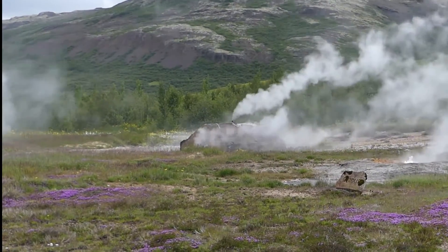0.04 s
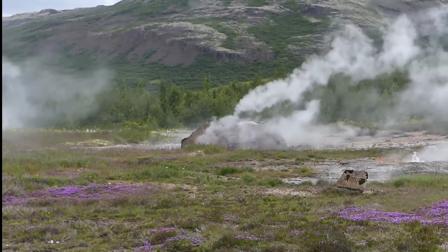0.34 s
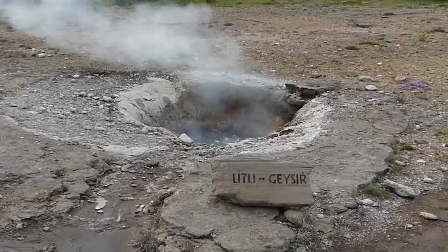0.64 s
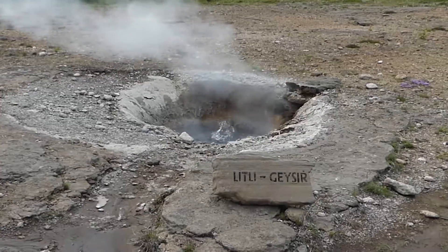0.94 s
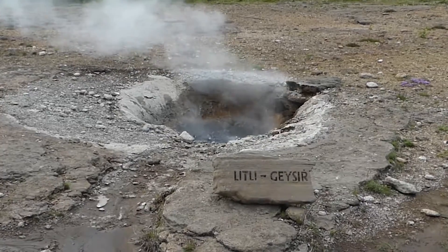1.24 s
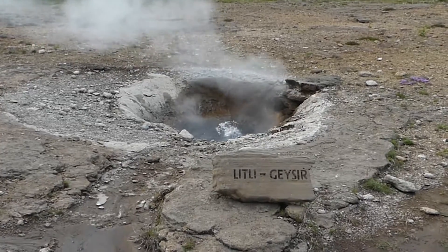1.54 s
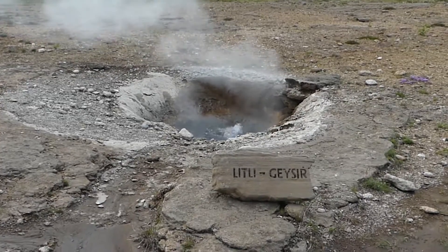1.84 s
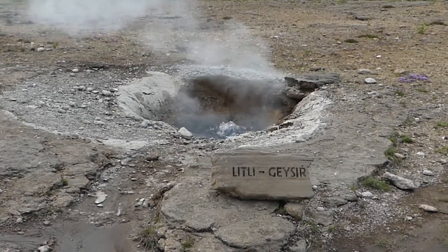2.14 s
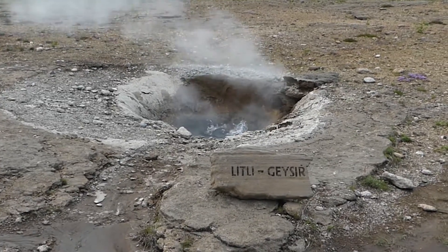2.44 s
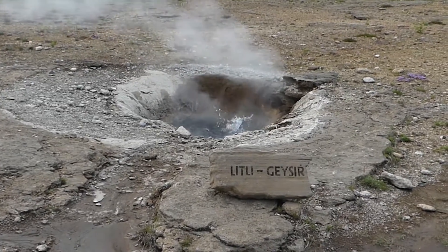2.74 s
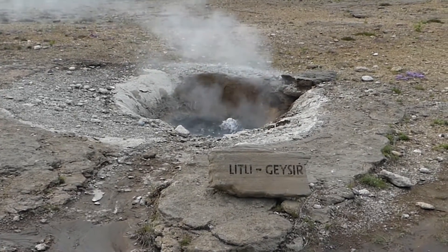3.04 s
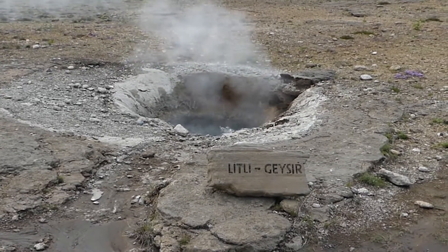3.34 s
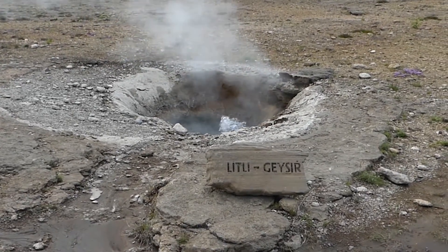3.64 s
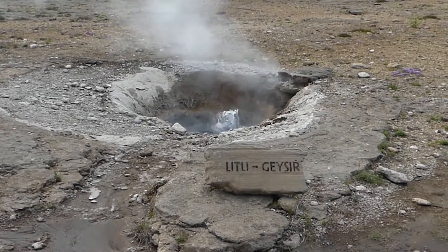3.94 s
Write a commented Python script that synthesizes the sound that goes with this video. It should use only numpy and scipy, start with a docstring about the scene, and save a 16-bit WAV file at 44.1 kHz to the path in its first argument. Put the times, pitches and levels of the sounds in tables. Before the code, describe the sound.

A far helicopter chops past a small boiling pool, following a moment of buffeting wind.

```python
"""Gusts of wind buffet the microphone over the hiss of far steam vents, with a few ticks and faint chirps. This
first scene of a geothermal field stops dead with a click. After a short silence a small boiling pool fades in:
bubbles ring, drops patter, steam hisses and water spits. A distant helicopter drifts from the left towards the
centre. Its main blades thump and chop the air into a roar and a swelling rush, all bouncing off the ground,
while its tail rotor hums and whines. A thin rising whistle comes at the very end."""
import sys
import numpy as np
from scipy import signal
from scipy.fft import rfft, irfft
from scipy.io import wavfile
from scipy.ndimage import uniform_filter1d

SR = 44100
rng = np.random.default_rng(int(sys.argv[2]) if len(sys.argv) > 2 else 0)


def inscribe(sig):
    """Save sig as 16-bit PCM at rate SR to the path in sys.argv[1].

    A 1-D sig is mono; a 2-D sig holds one channel per row.
    Samples are clipped to [-1, 1] before scaling.
    """
    pcm = np.round(np.clip(np.atleast_2d(sig).T, -1, 1) * 32767)
    wavfile.write(sys.argv[1], SR, pcm.astype(np.int16))


N = 176400

WIND_STOP_S, POOL_START_S, FADE_S, FADE_FROM_DB = .663, .897, .21, -19.5
BLADE_HZ, TAIL_HZ = 12.98, 84.3  # blade passes per second: main rotor, tail rotor
THUMP_AT_S, DOPPLER_PER_S = 2.256, .0045  # time of one thump; share of the pitch lost each second

# Levels in the tables are relative: the functions may turn a whole layer up or down.
# strength of the gusts (time [s], level [dB])
GUST_LEVELS = [(0.0, -36.5), (0.032, -43.5), (0.186, -31.5), (0.202, -25.5), (0.256, -30.5), (0.378, -28),
               (0.412, -32), (0.5, -24.5), (0.532, -29.5), (0.594, -23.5), (0.618, -35), (0.645, -23.5)]
# tone colour of wind on the microphone (frequency [Hz], level [dB])
WIND_COLOUR = [(25, -46.5), (60, -12.5), (130, 1), (220, -0.5), (340, -9), (480, -17), (800, -30.5),
               (2000, -54)]
# tone colour of the far steam vents (frequency [Hz], level [dB])
VENT_COLOUR = [(100, 6.5), (500, -0.5), (1400, 2), (2500, -8), (4000, -15.5), (6300, -16.5), (8000, -21),
               (11000, -20), (15500, -31)]
# faint high chirps, perhaps birds (time [s], length [s], level [dB], pitch [Hz], rise [octaves/s])
CHIRP_NOTES = [(.071, .003, -54.5, 7600, -10), (.133, .004, -53.5, 6100, 0), (.256, .003, -54.5, 5500, -10),
               (.302, .003, -45, 3380, -3), (1.335, .015, -66, 7700, 0), (2.687, .007, -44.5, 3240, 2.5)]
# ticks and spits, plus the sharp click at .661 s as the first scene stops (time [s], peak [dB], pitch [Hz],
# width [octaves], decay [s], left minus right [dB])
TICK_BURSTS = [(.142, -39, 2400, .4, .004, -10), (.166, -29.5, 1600, .7, .0017, 8),
               (.427, -29, 6900, 3, .0007, -3), (.482, -39, 1700, .7, .002, 0),
               (.583, -37, 2200, 1, .003, -2), (.661, -21, 1800, 2.2, .0006, 0),
               (1.652, -33, 1900, .33, .0037, 4), (1.779, -42, 9000, 1, .005, -2),
               (2.100, -38, 4500, .7, .002, -3), (2.117, -32, 4800, .85, .002, -6),
               (2.348, -38, 3200, .6, .0015, 0), (2.371, -41, 6500, .5, .002, -2.5),
               (2.381, -40, 6000, .7, .003, -3), (2.397, -31, 2200, .6, .003, 2),
               (2.405, -30.5, 2300, .7, .006, -1), (2.423, -32, 3000, .9, .004, -1),
               (2.474, -34, 2800, .5, .004, -3), (2.733, -38, 3400, .3, .002, -3),
               (2.858, -38, 12600, .2, .0015, -1), (3.021, -33, 2800, .6, .005, -.5),
               (3.036, -35, 2800, .35, .003, 0), (3.078, -38, 6500, .8, .003, -7),
               (3.105, -32, 4880, .58, .003, -5), (3.12, -37.5, 4400, .5, .007, -5),
               (3.329, -41, 4500, 1, .002, -2), (3.965, -35, 4500, .8, .0024, -2.5)]
# single swirls of air that knock on the microphone (time [s], peak [dB], pitch [Hz])
WIND_KNOCKS = [(.206, -20.5, 450), (.370, -20.5, 300), (0.47, -24, 384), (0.495, -19, 142),
               (0.586, -15, 242)]
# where the helicopter is heard (time [s], left minus right [dB])
HELICOPTER_PAN = [(1.0, 6.4), (1.7, 5.6), (2.3, 3.4), (3.0, 2), (4.0, 2)]
# loudness of the rotors' thump, roar and hum (time [s], level [dB])
ROTOR_LEVELS = [(1.1, -36), (1.4, -37), (1.6, -36), (1.85, -33), (2.05, -33.5), (2.3, -30.5), (2.7, -33.5),
                (3.0, -37), (3.35, -38.5), (3.7, -36), (4.0, -33.5)]
# tone colour of a blade's thump (frequency [Hz], level [dB])
THUMP_COLOUR = [(25, -99), (50, -25), (100, 4), (140, 5.5), (180, 0), (220, 6), (290, -8), (600, -55)]
# tone colour of the main rotor's low roar (frequency [Hz], level [dB])
ROAR_COLOUR = [(30, -60.5), (80, 2), (130, 12.5), (200, 9), (270, 7), (370, 2), (520, -5.5), (900, -27.5)]
# loudness of the helicopter's rushing air (time [s], level [dB])
RUSH_LEVELS = [(1.08, -42), (1.2, -39), (1.35, -37.5), (1.52, -35.5), (1.8, -33), (2.02, -36.5),
               (2.15, -34), (2.42, -32.5), (2.6, -34), (2.72, -37), (2.9, -34), (3.14, -35.5), (3.18, -41),
               (3.3, -38.5), (3.48, -42), (3.68, -39), (3.85, -37), (3.98, -32.5)]
# tone colour of that rushing air (frequency [Hz], level [dB])
AIR_COLOUR = [(100, -11), (300, 4.5), (480, 4), (700, 0.5), (1050, -4), (1500, -13), (2200, -20),
              (3200, -36), (6000, -66.5)]
# loudness of the tail rotor's whine (time [s], level [dB])
WHINE_LEVELS = [(1.12, -43), (1.62, -42), (1.71, -25.5), (1.84, -26), (2.0, -33), (2.17, -32), (2.29, -26),
                (2.42, -32), (2.6, -36.5), (2.85, -31.5), (3.0, -28.5), (3.08, -31), (3.15, -27),
                (3.25, -27), (3.31, -36), (3.4, -31.5), (3.6, -35), (3.7, -32), (3.92, -32), (3.98, -29)]
# tones in the whine of tail rotor and gears (pitch [times TAIL_HZ], level [dB])
WHINE_TONES = [(3.855, -8), (4, -3), (6, -17), (8, -15), (10, -18), (12, -22)]
# moments when one whine tone flares up (time [s], length [s], level [dB], pitch [times TAIL_HZ])
WHINE_FLARES = [(2.102, 0.014, -34, 12), (2.165, 0.018, -34, 12), (2.52, .02, -33, 8),
                (2.615, 0.028, -32.5, 8), (2.95, .012, -30, 8), (3.075, .018, -33, 8),
                (3.132, .014, -31.5, 8)]
# how hard the pool boils (time [s], level [dB])
BOIL_LEVELS = [(1.08, -65.5), (1.35, -64), (1.5, -56), (1.8, -56.5), (2.03, -60), (2.14, -52.5),
               (2.3, -54.5), (2.42, -52), (2.55, -54.5), (2.7, -55), (2.9, -56.5), (3.03, -52), (3.13, -53),
               (3.25, -55.5), (3.45, -61), (3.72, -59), (3.82, -53), (3.98, -54)]
# tone colour of the fine spray (frequency [Hz], level [dB])
SPRAY_COLOUR = [(400, -9.5), (1500, 13), (3000, 1), (4200, -5.5), (6300, -4), (7600, -14), (10000, -9),
                (15500, -17)]
# tone colour of steam hissing off the pool (frequency [Hz], level [dB])
HISS_COLOUR = [(3000, -2.5), (6300, 3), (7600, 2), (10500, 6.5), (15500, -2)]
# brief swells of rushing noise (peak time [s], length [s], level [dB], pitch [Hz])
RUSH_SWELLS = [(1.244, .042, -44, 1300), (1.78, .08, -40, 1000), (3.595, .02, -39.5, 886),
               (3.757, .003, -34, 870), (2.405, .028, -36.5, 1500), (2.465, .04, -31.5, 760),
               (2.84, .03, -32.5, 660), (2.855, .075, -32.5, 1080), (3.98, .03, -33, 520)]
# a thin rising whistle, perhaps a bird (time [s], pitch [Hz], level [dB])
WHISTLE_GLIDE = [(3.88, 1850, -60), (3.925, 1980, -54), (3.955, 2230, -45), (3.975, 2480, -50),
                 (4.0, 2560, -47)]


def undb(db):
    """Turn decibels into a gain to multiply by."""
    return 10 ** (np.asarray(db) / 20)


def unit(x):
    """Scale a signal to an average (rms) level of 1."""
    return x / np.sqrt(np.mean(x ** 2) + 1e-20)


def curve(rows, column=1):
    """One column of a table, joined by straight lines in time."""
    rows = np.array(rows, float)
    return np.interp(np.arange(N) / SR, rows[:, 0], rows[:, column])


def wobble(per_s):
    """A smooth random wander of size about 1, with per_s new values a second."""
    hold = int(SR / per_s)
    steps = np.repeat(rng.standard_normal(N // hold + 1), hold)
    return unit(uniform_filter1d(uniform_filter1d(steps, hold), hold)[:N])


def swell(when, length):
    """A bell-shaped rise and fall around a moment."""
    return np.exp(-.5 * ((np.arange(N) / SR - when) / length) ** 2)


def colour(x, points):
    """Give x a tone colour from (Hz, dB) points, falling away past both ends; the result has level 1."""
    hz, db = np.array(points, float).T
    f = np.maximum(np.arange(N + 1) * SR / (2 * N), 1)
    gain = undb(np.interp(np.log(f), np.log(hz), db))
    gain *= np.minimum(f / hz[0], 1) * np.minimum(hz[-1] / f, 1) ** 2
    # this folding makes the filter ring only after a sound, never before it
    cepstrum = irfft(np.log(gain))
    cepstrum[1:N] *= 2
    cepstrum[N + 1:] = 0
    return unit(irfft(rfft(x, 2 * N) * np.exp(rfft(cepstrum)))[..., :N])


def band(x, hz, octaves):
    """Keep a bell-shaped range of pitches around hz."""
    size = x.shape[-1]
    f = np.maximum(np.arange(size // 2 + 1) * SR / size, 1)
    return irfft(rfft(x) * np.exp(-.5 * (np.log2(f / hz) / octaves) ** 2), size)


def noise(width_db):
    """Stereo white noise; the lower width_db, the more alike left and right are."""
    mid, side = rng.standard_normal((2, N))
    return mid + undb(width_db) * np.array([side, -side])


def pan(db):
    """Left and right gains; a positive db moves the sound to the left."""
    return undb(np.array([db, -db]).reshape(2, -1) / 2)


def wind():
    """Gusts shed swirls of air over the microphone's openings, making a fluttering rumble."""
    swirls = colour(noise(width_db=-3) * undb(2 * wobble(58.34)), WIND_COLOUR)
    return swirls * undb(curve(GUST_LEVELS) + 2.5) * pan(2)


def steam_vents():
    """Far vents hiss and sputter behind the wind."""
    hiss = colour(noise(width_db=-4), VENT_COLOUR) * undb(-46 + 1.3 * wobble(13))
    sputter = undb(-59.5) * droplets()
    return (hiss + sputter) * pan(2.5)


def plinks(per_s, low_hz, high_hz, cycles, rise, tilt, spread_db):
    """Bubbles or drops ring briefly; rise bends each pitch up, tilt makes the big, low ones louder."""
    out = np.zeros((2, N + SR))
    for when, height, strength, place in rng.random((int(per_s * N / SR), 4)):
        hz = low_hz * (high_hz / low_hz) ** height
        age = np.linspace(0, 1, int(min(cycles / hz, .5) * SR))
        ring = np.sin(2 * np.pi * cycles * age * (1 + rise * age)) * undb(-60 * age)
        boost_db = spread_db * min(-np.log(1 - strength), 5)  # a few stand out from the rest
        gain = undb(boost_db) * (low_hz / hz) ** tilt
        start = int(when * N)
        out[:, start:start + len(age)] += ring * gain * pan(14 * (place - .5))
    return unit(out[:, :N])


def droplets():
    """Tiny drops patter, each with a short high ring."""
    return plinks(per_s=800, low_hz=2200, high_hz=13000, cycles=12, rise=0, tilt=.75, spread_db=3.2)


def chirps():
    """Tiny gliding, warbling notes from far away."""
    out, t = 0, np.arange(N) / SR
    warble = 1 + .02 * wobble(450)
    for when, length, db, hz, rise in CHIRP_NOTES:
        pitch = hz * warble * 2 ** (rise * np.clip(t - when, -4 * length, 4 * length))
        out = out + undb(db) * swell(when, length) * np.sin(2 * np.pi * np.cumsum(pitch) / SR)
    return out


def ticks(size=4096):
    """Sharp ticks and spits: each is a burst of noise that starts fast and dies away."""
    out, age = np.zeros((2, N + size)), np.arange(size) / SR
    for when, db, hz, octaves, decay, pan_db in TICK_BURSTS:
        shape = np.exp(-age / decay) * (1 - np.exp(-age / (.4 * decay)))
        burst = band(rng.standard_normal(size), hz, octaves) * shape
        start = int(when * SR)
        out[:, start:start + size] += burst / np.abs(burst).max() * undb(db) * pan(pan_db)
    return out[:, :N]


def knocks():
    """A swirl of air hits the microphone as a single swing of pressure."""
    t = np.arange(N) / SR
    return sum(undb(db) * swell(when, .3 / hz) * np.cos(2 * np.pi * hz * (t - when))
               for when, db, hz in WIND_KNOCKS) * pan(9)


def ground_bounce(x, delay_s=.005786, echo_db=-5):
    """The ground adds a slightly late copy, which boosts some pitches and weakens others."""
    late = irfft(rfft(x) * np.exp(-2j * np.pi * np.arange(N // 2 + 1) * delay_s * SR / N), N)
    return unit(x + undb(echo_db) * late)


def main_rotor(clock):
    """Each passing blade thumps once and chops the churning air into a low roar and a higher rush."""
    blades = BLADE_HZ * clock
    pulses = np.diff(np.floor(blades), prepend=np.floor(blades[0])) * undb(-2 * wobble(7.7))
    slap_db = 2.5 * swell(when=2.35, length=.22)  # hardest while the rotor disc faces the listener
    thumps = undb(-7.5 + slap_db) * ground_bounce(colour(pulses - pulses.mean(), THUMP_COLOUR))
    chop = 1 + .095 * np.cos(2 * np.pi * (blades - .5))
    roar = undb(-4) * ground_bounce(colour(noise(width_db=-14) * chop, ROAR_COLOUR))
    air = noise(width_db=-10) * chop * undb(.9 * wobble(44.81))
    rush = ground_bounce(colour(air, AIR_COLOUR))
    return (thumps + roar) * undb(curve(ROTOR_LEVELS)) + rush * undb(curve(RUSH_LEVELS) + 3)


def tail_rotor(clock, jitter=.00288, waver_db=1.2):
    """The small fast blades hum and, with their gears, whine; now and then one tone flares up."""
    phase = 2 * np.pi * TAIL_HZ * (clock + np.cumsum(jitter * wobble(10)) / SR)

    def tone(multiple):
        sine = np.sqrt(2) * np.sin(multiple * phase + 2 * np.pi * rng.random())
        return sine * undb(waver_db * wobble(12))

    whine = sum(undb(db) * tone(multiple) for multiple, db in WHINE_TONES)
    hum = tone(2) * undb(curve(ROTOR_LEVELS) - 7)
    flares = sum(undb(db) * swell(when, length) * np.sin(multiple * phase)
                 for when, length, db, multiple in WHINE_FLARES)
    return hum + whine * undb(curve(WHINE_LEVELS) - 2.5) + flares


def helicopter():
    """Both rotors share a slowing clock, so the pitch sinks as the helicopter passes (Doppler effect)."""
    t = np.arange(N) / SR - THUMP_AT_S
    clock = t - DOPPLER_PER_S * t ** 2 / 2
    return (main_rotor(clock) + tail_rotor(clock)) * pan(curve(HELICOPTER_PAN))


def pool():
    """The boil throws up drops and fine spray; the bubbling follows it loosely; steam hisses steadily."""
    boil_db = curve(BOIL_LEVELS)
    drops = undb(boil_db - 1.5) * droplets()
    spray = undb(boil_db + 7) * colour(noise(width_db=-4.5), SPRAY_COLOUR)
    bubbles = plinks(per_s=240, low_hz=455.6, high_hz=4100, cycles=17.4, rise=.495, tilt=1, spread_db=2.5)
    hiss = undb(-64) * colour(noise(width_db=0), HISS_COLOUR)
    return drops + spray + bubbles * undb(.37 * boil_db - 21.5) + hiss


def rush_swells(flutter_db=2):
    """Brief fluttering swells of mid-pitched rushing noise, with an echo off the ground."""
    out = 0
    for when, length, db, hz in RUSH_SWELLS:
        rush = ground_bounce(band(noise(width_db=-11), hz, octaves=.56))
        out = out + rush * swell(when, length) * undb(db + flutter_db * wobble(120))
    return out


def whistle():
    """A thin, pure tone that glides upward."""
    started = np.arange(N) / SR > WHISTLE_GLIDE[0][0]
    soft_start = uniform_filter1d(1. * started, size=400)
    tone = np.sin(2 * np.pi * np.cumsum(curve(WHISTLE_GLIDE)) / SR)
    return tone * undb(curve(WHISTLE_GLIDE, column=2)) * soft_start


def scene():
    """The windy scene stops dead, then the pool scene fades in; ticks and chirps dot both."""
    t = np.arange(N) / SR
    windy_scene = wind() + steam_vents() + knocks()
    pool_scene = helicopter() + pool() + rush_swells() + whistle()
    fade_in = (t > POOL_START_S) * undb(FADE_FROM_DB * np.clip(1 - (t - POOL_START_S) / FADE_S, 0, 1))
    return windy_scene * (t < WIND_STOP_S) + pool_scene * fade_in + ticks() + chirps()


def record(dry):
    """A steep filter removes the highest treble, above 15800 Hz."""
    return signal.sosfilt(signal.ellip(8, .2, 70, 15800, fs=SR, output="sos"), dry)


dry = scene()
out = record(dry)
inscribe(out)
```